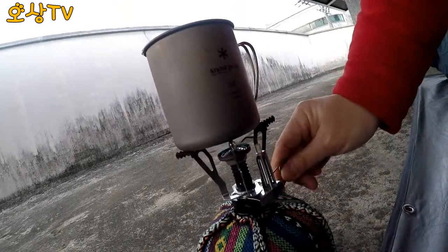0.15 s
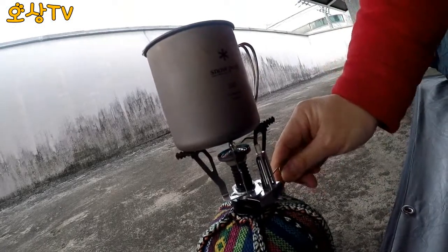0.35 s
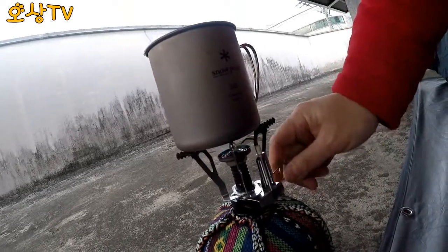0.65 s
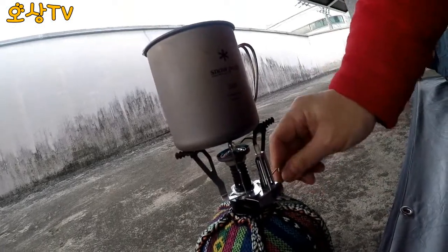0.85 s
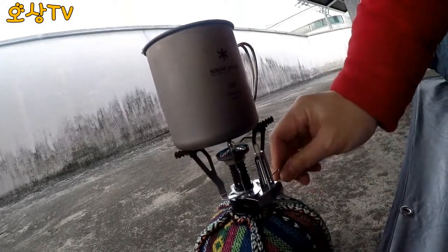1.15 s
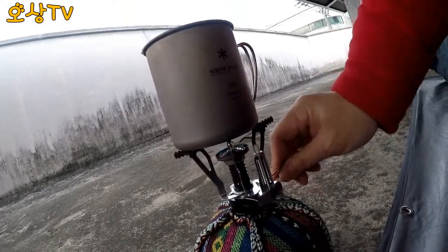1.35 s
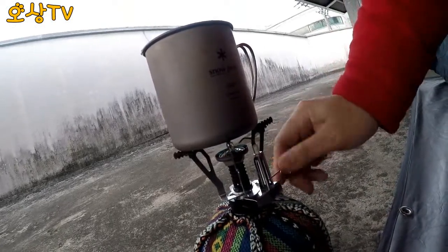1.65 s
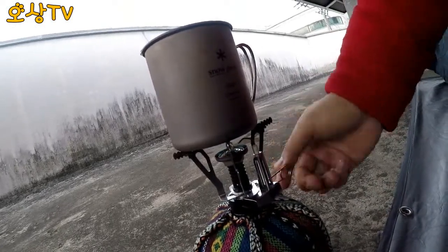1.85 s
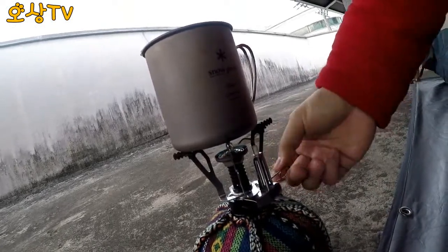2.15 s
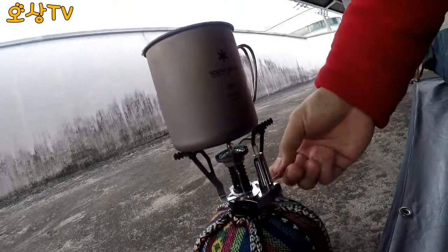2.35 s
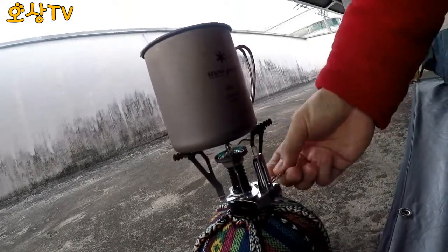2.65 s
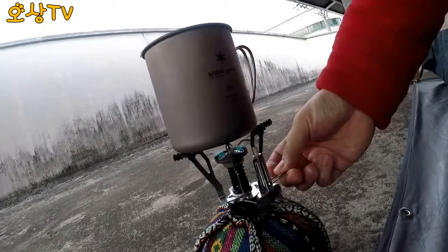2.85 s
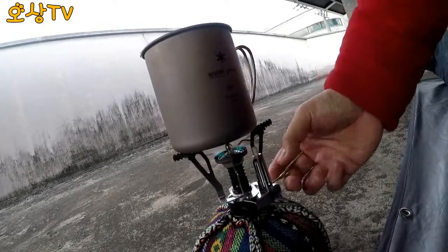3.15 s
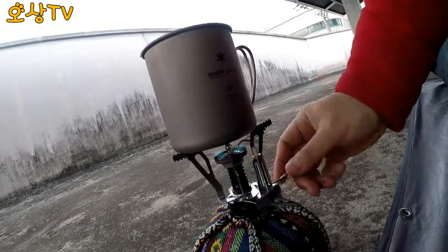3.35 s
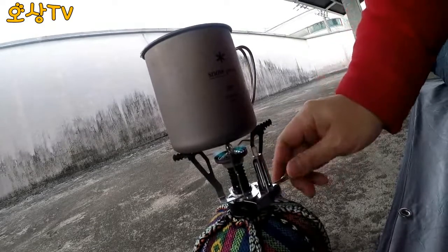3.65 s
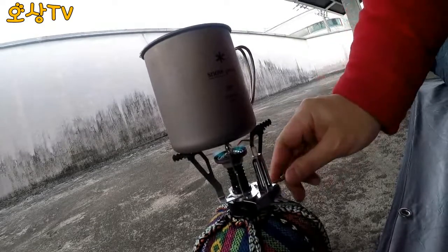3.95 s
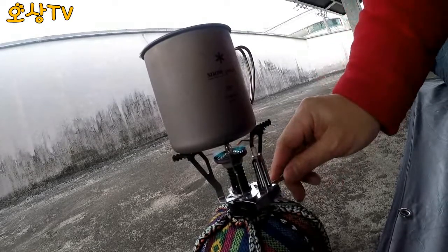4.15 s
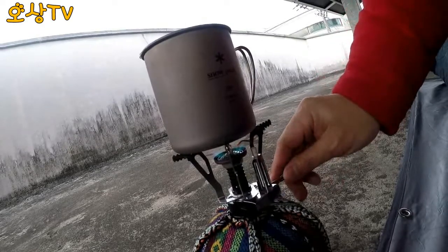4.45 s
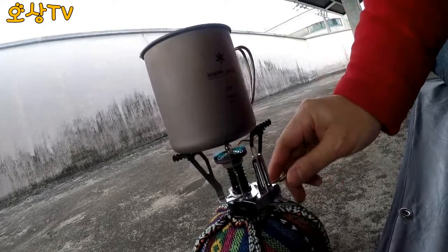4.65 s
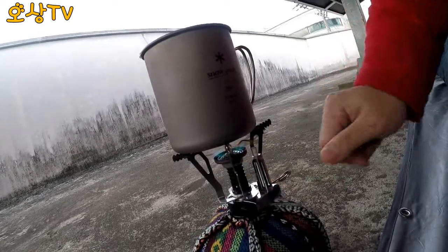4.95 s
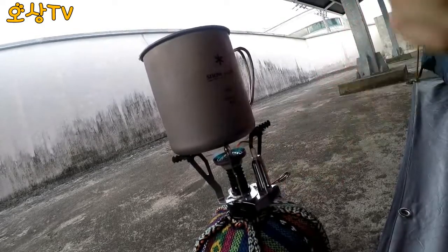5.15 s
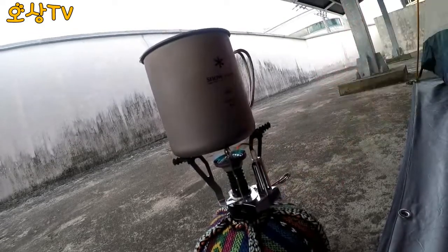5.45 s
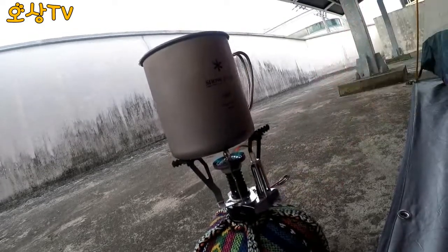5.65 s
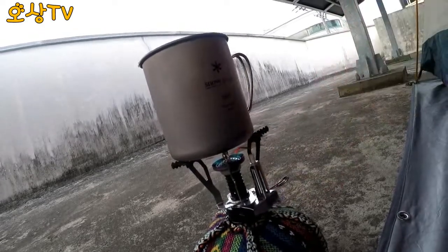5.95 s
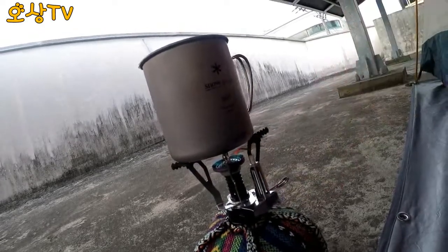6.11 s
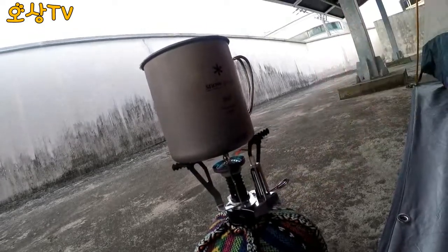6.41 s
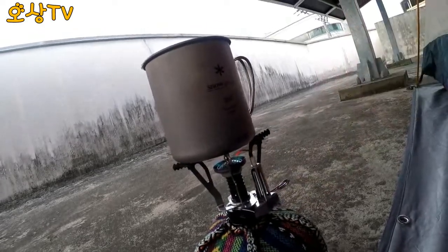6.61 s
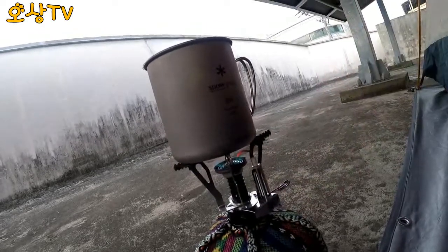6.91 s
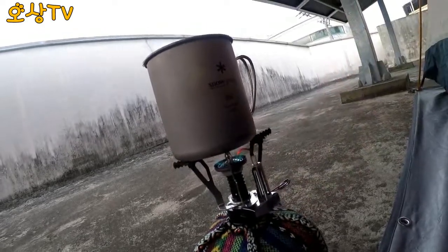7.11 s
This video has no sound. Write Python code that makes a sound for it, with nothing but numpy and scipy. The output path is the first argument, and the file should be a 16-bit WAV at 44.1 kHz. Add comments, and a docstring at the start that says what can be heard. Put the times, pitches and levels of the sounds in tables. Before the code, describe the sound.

A camping burner hisses up briefly and dies back amid low wind thumps, followed by loud bumps, cloth swish and scraping on the microphone.

```python
"""A small gas stove burns outdoors: noise through burner resonances, over a low roar, is turned up and dies back.
Wind buffets and surges, as slow noise, at the two microphone ports of a nearby housing.
The housing is knocked and shudders (ringing modes), is rubbed (scrape and hiss) and cloth swishes past (noise).
Behind lie a far wash, a thin hiss, a low hum and a faint high tone."""
import sys
import numpy as np
from scipy import signal
from scipy.io import wavfile
from scipy.ndimage import uniform_filter1d

SR = 44100
rng = np.random.default_rng(int(sys.argv[2]) if len(sys.argv) > 2 else 0)


def put_to_file(sound):
    """Save the sound as 16-bit audio at rate SR, in the file named by the first command-line argument."""
    columns = np.atleast_2d(sound).T  # one column per channel
    safe = np.clip(columns, -1, 1)
    whole_steps = np.round(safe * 32767)
    wavfile.write(sys.argv[1], SR, whole_steps.astype(np.int16))


N = 320915

# housing modes: (frequency [Hz], t60 [s], left [dB], right [dB], right lags by [rad])
HOUSING_MODES = [(88.6, 0.11, -1.5, 0.5, 2.61), (146, 0.068, -10, -8.5, 0.92), (205.8, 0.051, 0, 2, 2.46),
                 (411.4, 0.044, -9.5, -1, 1.86), (468, 0.034, -5, -6, 2.19), (606, 0.03, -13.5, -17, 2.4),
                 (840, 0.026, -5.5, -9.5, 2.7), (1264, 0.044, -17, -18.5, 5.5)]


def amp(db):
    """Amplitude factor of a level in dB."""
    return 10 ** (np.asarray(db) / 20)


def read(points, hz):
    """Columns of a spectrum table, interpolated over log frequency."""
    f, *columns = np.transpose(points)
    return [np.interp(np.log(hz + 1), np.log(f + 1), c)[:, None] for c in columns]


def curve(rows):
    """Columns of a control table at every sample, and a gate with 1.2 ms ramps over its span."""
    s, *columns = np.transpose(rows)
    t = np.arange(N) / SR
    gate = np.clip(np.minimum(t - s[0], s[-1] - t) / 0.0012, 0, 1)
    return gate, [np.interp(t, s, c) for c in columns]


def away(peak_s, rise_s, fall_s):
    """Distance of every sample from a peak, in rise times before it and fall times after, 12 at most."""
    t = np.arange(N) / SR - peak_s
    distance = np.where(t < 0, -t / max(rise_s, 0.002), t / max(fall_s, 0.002))
    return np.minimum(distance, 12)


def pan(db):
    """Left and right gains, as a column, for a left-minus-right difference in dB."""
    return amp(np.array([[0.5], [-0.5]]) * db)


def noise(colour, ports, band_hz, patchy_db, flicker_db, size=512):
    """Two-port noise with drifting patches and shared flicker; the band of its port mean has rms 1."""
    hop = size // 4
    frames = N // hop + 5
    hz = np.fft.rfftfreq(size, 1 / SR)
    a, b, c, d, patches = rng.standard_normal((frames, len(hz), 5), dtype=np.float32).T
    patches = uniform_filter1d(uniform_filter1d(patches, size=7, axis=0), size=9, axis=1)
    flicker = uniform_filter1d(rng.standard_normal(frames), size=4)

    likeness, lead_rad, pan_db = read(ports, hz)
    likeness = np.clip(likeness, 0, 1)
    left = a + 1j * b
    right = likeness * left * np.exp(-1j * lead_rad) + np.sqrt(1 - likeness ** 2) * (c + 1j * d)
    z = np.array([left * amp(pan_db / 2), right * amp(-pan_db / 2)])
    wander_db = patchy_db * patches / patches.std() + flicker_db * flicker / flicker.std()
    z *= amp(read(colour, hz)[0] + wander_db)

    inside = (hz >= band_hz[0]) & (hz <= band_hz[1])
    centre = signal.istft(z.mean(0) * inside[:, None], nperseg=size, noverlap=size - hop)[1]
    return signal.istft(z, nperseg=size, noverlap=size - hop)[1][:, :N] / centre.std()


def tone(hz, width_hz, db):
    """A narrow wavering tone: a carrier under slow, amplitude-limited complex noise."""
    white = rng.standard_normal(N) + 1j * rng.standard_normal(N)
    slow = signal.lfilter([1], [1, -np.exp(-np.pi * width_hz / SR)], white)
    limited = slow / (abs(slow) + abs(slow).mean())
    wavering = (limited * np.exp(2j * np.pi * hz * np.arange(N) / SR)).real
    return amp(db) * wavering / wavering.std()


def resonances(modes):
    """A spectrum table made of steep-sided broad peaks."""
    hz = np.geomspace(300, 15000, num=200)
    power = sum(amp(2 * db) / (1 + (2 * (hz - f) / width_hz) ** 2) ** 3 for f, width_hz, db in modes)
    return np.c_[hz, 10 * np.log10(power)]


def ringing(modes, t):
    """Impulse response of each mode at the two ports, swelling within the first cycle."""
    responses = []
    for hz, t60_s, left_db, right_db, lag_rad in modes:
        decay = amp([[left_db], [right_db]] - 60 * t / t60_s)
        swell = 1 - np.exp(-3 * hz * t)
        responses.append(decay * swell * np.sin(2 * np.pi * hz * t - [[0], [lag_rad]]))
    return np.array(responses)


def air():
    """Open-air background: a smooth far wash, a thin hiss, a low hum and one faint high tone."""
    # levels, low flame included: (time [s], wash [dB], hiss [dB])
    levels = [(0, -59.5, -60), (.5, -59, -56.5), (.75, -60, -61), (5.06, -59, -61.5), (6.1, -56, -58.5),
              (6.5, -57, -62.5), (6.545, -63, -72), (6.62, -59, -62.5), (6.85, -61, -67.5), (7, -65, -68.5),
              (7.28, -64.5, -66)]
    # spectra: (frequency [Hz], relative density [dB per Hz])
    wash_colour = [(65, -50), (110, -1), (157, -1.5), (200, -6), (235, -13.5), (311, -12.5), (369, -20.5),
                   (520, -21.5), (598, -23), (1200, -27.5), (1450, -30), (4500, -47), (5850, -78),
                   (9900, -120)]
    hiss_colour = [(2500, -3.5), (4000, -8), (5000, -6.5), (6300, 0.5), (7800, -3), (10000, -3.5),
                   (11500, -8.5), (13000, -5), (14800, -41)]
    # (frequency [Hz], left-right likeness [0-1], left leads by [rad], left minus right [dB])
    ports = [(104, 0.98, -0.1, 2.5), (195, 1, 0, -0.5), (385, 0.56, 0, -3), (630, 0.94, 1.5, -2),
             (1150, 1, 1.83, 2), (2180, 0.7, 1.68, 1.5), (3780, 0.71, 0.5, 0), (7000, 0.15, 1.5, -1.5),
             (12400, 0.37, 2, -1)]
    # distant tone: (frequency [Hz], width before limiting [Hz], peak level relative to wash [dB])
    drone_setting = (1368, 4.4, -5)
    # steady distant hum: (frequency [Hz], width before limiting [Hz], mid level [dB])
    hum_setting = (211, 2.6, -43)

    _, (wash_db, hiss_db) = curve(levels)
    swell = amp(-6.9 * away(peak_s=1.85, rise_s=1.2, fall_s=1.8) ** 2)
    drone = swell * tone(*drone_setting)
    wash = noise(wash_colour, ports, (1500, 4500), patchy_db=1.98, flicker_db=0.08, size=1024)
    hiss = noise(hiss_colour, ports, (4500, 9000), patchy_db=1.5, flicker_db=0.6)
    hum = pan(-3) * tone(*hum_setting)
    return amp(wash_db) * (wash + drone) + amp(hiss_db) * hiss + hum


def wind():
    """Eddies push the ports unevenly and partly against each other; slow pressure surges lie below."""
    # spectra: (frequency [Hz], relative density [dB per Hz])
    buffet_colour = [(10, -32), (20, -0.5), (30, 0.5), (48, 5.5), (75, -5), (115, -8), (170, -34),
                     (300, -80)]
    surge_colour = [(2, -1), (7, -0.5), (15, 28), (24, 16.5), (40, -74)]
    # wind between gusts, and surges: (time [s], level [dB], left minus right [dB])
    breeze_levels = [(0, -25.5, -4.5), (.6, -26, -9), (1.1, -33, -3.5), (2.7, -31.5, -6), (5, -31, -5),
                     (6, -29, -5), (6.4, -24, 8), (7.28, -28.5, 6.5)]
    surge_levels = [(0, -28, -32), (.3, -50, 16), (.67, -27, -5.5), (1, -34.5, 4), (2.78, -28.5, 3),
                    (3.18, -55, -19), (4.7, -35, -11), (5.2, -51, -4), (6.06, -30.5, -2),
                    (6.26, -17, -16.5), (6.46, -15.5, 3), (7.28, -26, 9)]
    # gusts: (peak time [s], length [s], peak level [dB], left minus right [dB])
    gusts = [(0.16, 0.15, -22, -5.5), (0.466, 0.12, -21.5, -14), (1.267, 0.072, -19.5, -5.5),
             (1.6, 0.15, -24.5, -9), (2.207, 0.13, -30.5, 3), (2.404, 0.1, -20.5, -6.5),
             (2.68, 0.13, -23, -4), (3.406, 0.19, -27, -9), (3.55, 0.048, -21.5, -3),
             (3.717, 0.13, -23, -4), (4.5, 0.17, -26, -1), (5.077, 0.057, -19.5, -17),
             (5.229, .1, -20.5, -3), (5.31, 0.12, -17, -2.5), (5.564, 0.086, -17.5, -1),
             (5.817, 0.71, -24.5, -3.5), (6.154, 0.057, -12.5, 2), (6.26, 0.063, -13, 7.5),
             (6.456, 0.09, -19, -2), (6.704, 0.21, -19, 6), (7.072, 0.17, -24, 6), (7.237, .15, -35, 0)]
    gust_drop_db, rise_share = 8.5, 0.62  # drop at a gust's ends; share of its length spent rising
    # (frequency [Hz], likeness [0-1], left leads by [rad], left minus right [dB])
    ports = [(20, 0.41, 4.35, 0.005), (200, 0.068, 2.74, 0.0039)]

    buffets = noise(buffet_colour, ports, (20, 110), patchy_db=0.86, flicker_db=0.5, size=2048)
    swing = np.sqrt(uniform_filter1d(buffets ** 2, size=2600, axis=1) + 0.034)
    buffets = buffets / swing ** 0.083  # slightly evens out single eddies
    surges = noise(surge_colour, ports, (4, 20), patchy_db=2.5, flicker_db=0.5, size=8192)

    _, (breeze_db, breeze_pan_db) = curve(breeze_levels)
    _, (surge_db, surge_pan_db) = curve(surge_levels)
    strength = amp(breeze_db) * pan(breeze_pan_db)
    for peak_s, length_s, db, pan_db in gusts:
        distance = away(peak_s, length_s * rise_share, length_s * (1 - rise_share))
        strength = np.maximum(strength, pan(pan_db) * amp(db - gust_drop_db * distance))
    return buffets * strength + surges * amp(surge_db) * pan(surge_pan_db)


def cloth():
    """Cloth brushing past nearby: the soft fibrous swish of broadband noise."""
    # (time [s], level [dB])
    levels = [(5.35, -61), (5.362, -41.5), (5.385, -36.5), (5.416, -44), (5.5, -42), (5.582, -33),
              (5.62, -36), (5.876, -38.5), (6.002, -46.5), (6.1, -50.5)]
    # (frequency [Hz], relative density [dB per Hz])
    colour = [(410, -36), (700, -7), (1470, -10.5), (1870, -6.5), (4700, -9), (5800, 0.5), (7420, 1),
              (8300, -8), (13200, -18.5), (14000, -8), (14800, -47)]
    # (frequency [Hz], left-right likeness [0-1], left leads by [rad], left minus right [dB])
    ports = [(690, 0.25, -1.5, -9), (2330, 0.67, 1.4, -6), (4280, 0.9, -0.5, -4), (6500, 0.8, -0.7, -2),
             (12100, 1, -2.16, 2)]

    gate, (level_db,) = curve(levels)
    colour = [(300, -63)] + colour
    swish = noise(colour, ports, (2000, 10000), patchy_db=0.5, flicker_db=0.3, size=256)
    return gate * amp(level_db) * swish


def rubs():
    """Friction travels through the housing as a dull scrape and through the air as hiss."""
    # strokes: (peak time [s], rise [s], fall [s], scrape [dB], airborne hiss relative to scrape [dB])
    strokes = [(5.22, 0.033, 0.022, -65.5, 10), (5.385, .015, 0.016, -52, -20),
               (6.127, 0.018, 0.067, -41.5, 10.5), (6.195, 0.047, .015, -48.5, -1),
               (6.25, 0.036, 0.022, -44, 2.5), (6.28, 0.034, .04, -48.5, -10),
               (6.32, 0.015, 0.04, -48.5, 2.5), (6.362, .06, 0.035, -39, -14), (6.38, 0.04, 0.013, -55, -1),
               (6.535, 0.057, 0.0076, -44.5, -8), (6.634, 0.029, 0.02, -53, -7),
               (6.807, 0.084, 0.099, -59, 0)]
    # spectra: (frequency [Hz], relative density [dB per Hz])
    scrape_colour = [(100, -16.5), (200, 4), (400, -1.5), (700, -7), (1300, -10), (2300, -19), (3000, -30),
                     (4200, -45)]
    hiss_colour = [(1500, -4), (2800, -3.5), (4500, -11), (6200, -1.5), (8500, -7.5), (11000, -21.5),
                   (14000, -48)]
    # (frequency [Hz], left-right likeness [0-1], left leads by [rad], left minus right [dB])
    ports = [(200, 0.2, 4.5, 0.5), (412, 0.9, 2.64, 3.5), (900, 0.9, 3.03, -2.5), (1600, 0.76, 3.2, 2.5),
             (2600, 0.65, 2, 1.5), (3800, 0.5, .3, -2), (5400, 0.7, 2.3, -1.5), (9100, 0.4, 0.75, -0.5)]
    edge_drop_db, dulling = 13.5, 0.58  # drop one rise or fall time from the peak; extra share for the hiss

    scrape = noise(scrape_colour, ports, (800, 3000), patchy_db=1.0, flicker_db=2.5, size=256)
    hiss = noise(hiss_colour, ports, (4500, 9000), patchy_db=0.5, flicker_db=1.0, size=256)
    out = np.zeros((2, N))
    for peak_s, rise_s, fall_s, db, hiss_db in strokes:
        drop_db = edge_drop_db * away(peak_s, rise_s, fall_s) ** 1.77
        out += amp(db - drop_db) * (scrape + amp(hiss_db - dulling * drop_db) * hiss)
    return out


def shudders():
    """Shudders of the mount keep the housing modes ringing, over a faint steady tremble."""
    # (peak time [s], level added to the still level [dB])
    peaks = [(.07, -36), (.5, -38), (5.25, -32), (5.6, -37.5), (5.9, -33), (6.77, -30.5), (7.05, -34)]
    rise_s, fall_s, edge_drop_db, still_db = 0.16, 0.12, 13, -55

    body = ringing(HOUSING_MODES, np.arange(SR // 6) / SR)
    shake = signal.lfilter([1], [1, -0.9], rng.standard_normal(N))
    tremble = signal.oaconvolve(shake[None], body.sum(0), axes=1)[:, :N]
    strength = amp(still_db)
    for peak_s, db in peaks:
        strength = strength + amp(db - edge_drop_db * away(peak_s, rise_s, fall_s))
    return strength * tremble / tremble.std()


def knocks():
    """Blows jolt the ports in opposite directions, ring the housing and clack its hard parts."""
    # (time [s], jolt [dB], contact [ms], weight on housing modes under 250 Hz [dB],
    #  clack relative to jolt [dB], weight on clack modes at 2.2-3 kHz [dB], at 3-5 kHz [dB],
    #  over 5 kHz [dB], left minus right [dB])
    blows = [(.33, -42.5, 0.18, -16, 10.5, 3, 8, 4, -4), (0.715, -26, 0.37, 2, -40, 0, 0, 0, -3.5),
             (.926, -15, 0.32, -5.5, -37, 0, 0, 0, 1), (0.9785, -7, 0.28, 3, -16, 10, 9, -14, -1.5),
             (0.9866, -17, 0.8, 14, -40, 0, 0, 0, -3), (5.0596, -10, 0.34, 22, -30, -8, -8, -16, 4.5),
             (5.071, -9, 0.18, 2.5, -4, 1, 1, 6, 1.5), (5.0775, -10, 0.67, 16, -34, 6, 10, 0, -1),
             (5.202, -18.5, 0.64, 10, -40, 0, 0, 0, -8), (5.541, -12, 0.52, 19, -32, 0, 0, 0, -2.5),
             (5.553, -10, 0.37, 4, -37, 0, 0, 0, 0), (5.836, -22, 0.5, 6, -40, 0, 0, 0, -1),
             (5.946, -10.5, 0.59, -7.5, -34, 0, 0, 0, -3.5), (6.115, -27, 0.31, 14, -4, 17, 0, -6, 22.5),
             (6.156, -24, 0.25, -3, -15, 0, -2, 0, 4), (6.18, -13.5, 0.53, -6, -27, 0, 0, 0, -3.5),
             (6.208, -11.5, 0.52, -8.5, -10.5, 4, -8, -14, -7), (6.27, -27, 0.42, -2, -30, 0, 0, -6, -4),
             (6.5373, -12.5, 0.22, -4.5, 2, -1, -4, -9, -1.5), (6.742, -18, 0.73, 6, -39, 0, 0, 0, -1),
             (6.754, -21, 0.89, -15, -44, 0, 0, 0, -18), (6.782, -17, 0.76, 1, -29, 0, 0, -6, 5.5),
             (6.928, -34, 0.43, -2, -27, 0, -6, -12, 21), (6.996, -13.5, 1, 0, -49, 0, 0, 0, 5),
             (7.007, -28.5, 0.62, -2, -24, 0, -6, -12, 12), (7.047, -20, 0.39, 10, -21, 0, -6, -12, -2),
             (7.098, -16, 0.63, 1, -35, 0, -6, -12, 10.5), (7.189, -14.5, 0.92, -7, -36, 0, -6, -12, 6.5),
             (7.215, -46, 0.23, -13, -1, 0, 0, 0, -7)]
    # hard plastic parts striking: (frequency [Hz], t60 [s], left [dB], right [dB], right lags by [rad])
    latch_modes = [(1210, 0.015, -6.5, 7, 2.1), (1480, 0.0097, -4.5, -2.5, 1.5),
                   (1773, 0.013, 2.5, -1, 0.79), (1890, 0.0098, 0.5, -6, 2.2), (2390, 0.015, -4.5, -7, 2.3),
                   (2680, 0.0071, -5, -15, 2), (3180, 0.0056, -8, -20, 1.6), (3810, 0.0084, -12, -9, 0.67),
                   (4100, 0.016, -23, -23, 0.62), (5470, 0.0062, -8.5, -6, 1), (5870, 0.006, -20, -14, 1),
                   (6800, 0.0071, -15, -11, 2.4), (7400, 0.0086, -29, -7, 3.8),
                   (8100, 0.006, -15, -26, 1.2)]
    ring_db, damping_db_per_ms = 11.5, 14.5  # longer contact, weaker ring
    rattle_s, first_impact, crack_db = 0.003, 17, -30

    t = np.arange(SR // 6) / SR
    body, latch = ringing(HOUSING_MODES, t), ringing(latch_modes, t)
    deep = np.array(HOUSING_MODES)[:, 0] < 250
    zone = np.digitize(np.array(latch_modes)[:, 0], [2200, 3000, 5000])
    latch[-1, :, :3] += amp(crack_db) * np.array([1, 0, -1])  # bare crack, weighted with the top zone

    out = np.zeros((2, N))
    for s, db, contact_ms, weight_db, clack_db, lower_db, middle_db, bright_db, pan_db in blows:
        contact_s = contact_ms / 1000
        lead_s = 4 * contact_s
        u = (t - lead_s) / contact_s
        u = np.where(u > 0, u / np.sqrt(1 + 0.29 * np.maximum(u, 0)), u)  # quick strike, slower release
        force = np.exp(-u ** 2 / 2)
        jolt = np.outer([1, -1], (1 - u ** 2) * force)  # the air in a port feels the acceleration

        weighted_body = np.tensordot(amp(weight_db * deep), body, axes=1)
        ring = signal.fftconvolve(force[None], weighted_body, axes=1)[:, :len(t)]
        ring *= amp(ring_db - damping_db_per_ms * contact_ms) / abs(ring).max()

        chatter = rng.standard_normal(len(t)) * np.exp(-t / rattle_s)
        chatter[0] = first_impact
        zone_gain = amp([0, lower_db, middle_db, bright_db])[zone]
        weighted_latch = np.tensordot(zone_gain, latch, axes=1)
        clack = signal.fftconvolve(chatter[None], weighted_latch, axes=1)[:, :len(t)]
        clack = np.roll(clack, round(lead_s * SR * 0.923), axis=1)  # starts just before the jolt's peak
        clack *= amp(clack_db) / abs(clack).max()

        blow = amp(db) * pan(pan_db) * (jolt + ring + clack)
        part = out[:, round((s - lead_s) * SR):][:, :len(t)]
        part += blow[:, :part.shape[1]]
    return out


def flame():
    """Turbulent gas hisses through the burner's resonances over the low roar of burning."""
    # opened valve, fluttering in the wind as it dies back:
    # (time [s], nozzle hiss [dB], rush under the cup [dB])
    levels = [(2.76, -63, -68), (2.808, -58, -62), (2.82, -48, -57), (2.85, -51, -54), (2.9, -45, -48.5),
              (2.93, -48, -51), (2.98, -45.5, -47.5), (3.03, -50, -53.5), (3.09, -43.5, -47.5),
              (3.11, -48, -51), (3.15, -46, -57.5), (3.17, -43, -49), (3.21, -48, -52.5),
              (3.23, -42.5, -50), (3.37, -54, -53), (3.42, -49.5, -50.5), (3.61, -56, -57.5),
              (3.65, -50, -57.5), (3.65, -52, -50), (3.69, -57, -56), (3.74, -49.5, -49), (3.79, -54, -57),
              (3.87, -57, -55.5), (3.98, -53.5, -58.5), (4.02, -49.5, -50), (4.11, -53, -54.5),
              (4.135, -53, -50), (4.145, -54, -48.5), (4.17, -56, -56.5), (4.24, -60, -60),
              (4.27, -50, -51), (4.33, -60, -59), (4.41, -66, -66), (4.48, -63, -64), (4.5, -70, -68),
              (4.56, -51, -54), (4.57, -58, -54.5), (4.69, -72, -64.5), (4.83, -65, -63),
              (4.98, -66, -69.5), (5.0, -58, -62), (5.04, -59, -60)]
    # burner tube: (frequency [Hz], width 9 dB down [Hz], relative level [dB])
    jet_modes = [(5800, 920, -10), (6490, 1270, 2.5), (7250, 1000, -2.5), (8950, 1100, -15.5),
                 (11900, 770, -21)]
    # space under the cup: (frequency [Hz], width 9 dB down [Hz], flaring [dB], settled [dB])
    rush_modes = [(704, 410, 5, 5), (1250, 730, 1.5, 2.5), (1840, 840, -4.5, -5.5), (2470, 550, -7, -14),
                  (3210, 1200, -5, -2.5), (4190, 1100, -7.5, -11), (4960, 1000, -14, -13.5)]
    # (frequency [Hz], relative density [dB per Hz])
    roar_colour = [(50, -23), (90, 2), (150, 2.5), (250, -0.5), (400, -7), (600, -19), (900, -28.5),
                   (1500, -47)]
    # (frequency [Hz], left-right likeness [0-1], left leads by [rad], left minus right [dB])
    ports = [(100, 1, -0.5, 0), (398, 0.96, 0, -4), (925, 0.77, 0.5, -1), (2300, 0.85, 1, 1.5),
             (4300, 0.87, 1.5, -1.5), (6000, 0.65, 0.18, -4), (6170, 1, 5.5, -10), (6740, 0.1, -1, -2),
             (11500, 0.3, -1, 0)]
    settled_s, settling_s = 3.2, 0.15  # middle and length of the crossfade
    full_flow_db, full_roar_db, roar_db_per_db = -49.5, -27.5, 0.69  # rush and roar at full flow; roar slope

    gate, (jet_db, rush_db) = curve(levels)
    jet = noise(resonances(jet_modes), ports, (5400, 7900), patchy_db=1.5, flicker_db=0.8)

    rush_modes = np.array(rush_modes)
    flaring_colour = resonances(rush_modes[:, [0, 1, 2]])
    settled_colour = resonances(rush_modes[:, [0, 1, 3]])
    flaring = noise(flaring_colour, ports, (2400, 4800), patchy_db=1.5, flicker_db=0.8)
    settled = noise(settled_colour, ports, (2400, 4800), patchy_db=1.5, flicker_db=0.8)
    share = np.clip(0.5 + (np.arange(N) / SR - settled_s) / settling_s, 0, 1)
    rush = np.sqrt(1 - share) * flaring + np.sqrt(share) * settled

    roar = noise(roar_colour, ports, (130, 500), patchy_db=1.5, flicker_db=1.0, size=1024)
    roar_db = full_roar_db + roar_db_per_db * (rush_db - full_flow_db)
    return gate * (amp(jet_db) * jet + amp(rush_db) * rush + amp(roar_db) * roar)


def scene():
    """All sources at the two ports."""
    return air() + wind() + cloth() + rubs() + shudders() + knocks() + flame()


def record(dry):
    """Soft overload near full scale, short end fades, a falling treble, a band limit."""
    # overall treble response: (frequency [Hz], gain [dB])
    treble = [(0, 0.5), (11500, -5.5), (13000, -10), (14200, -22)]
    edge_hz = 14933

    held = dry / (1 + dry ** 4) ** 0.25
    held = held * signal.windows.tukey(N, 0.004)
    hz, db = np.transpose(treble + [(SR / 2, -20)])
    colour = signal.firwin2(255, hz, amp(db), fs=SR)
    edge = signal.firwin(1023, edge_hz, window=("kaiser", 12), fs=SR)
    return signal.oaconvolve(held, np.convolve(colour, edge)[None], "same")


dry = scene()
out = record(dry)
put_to_file(out)
```